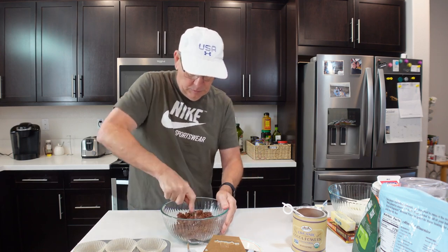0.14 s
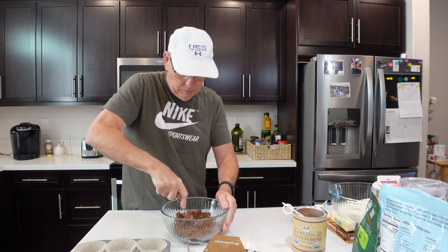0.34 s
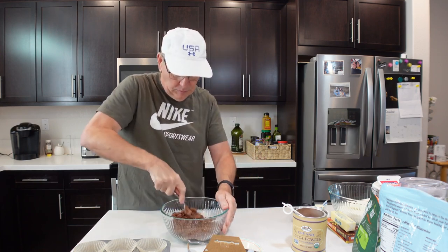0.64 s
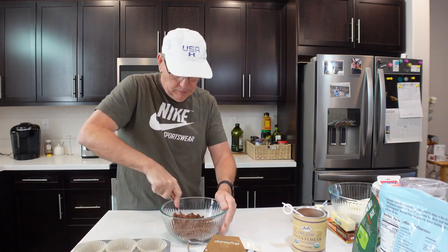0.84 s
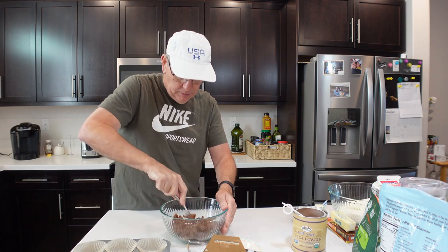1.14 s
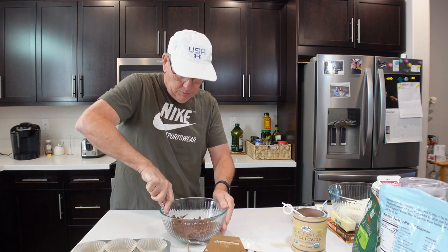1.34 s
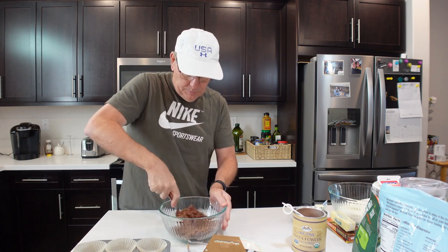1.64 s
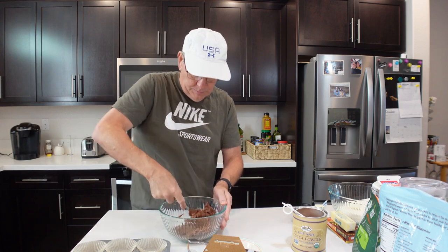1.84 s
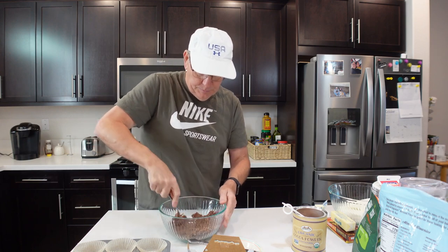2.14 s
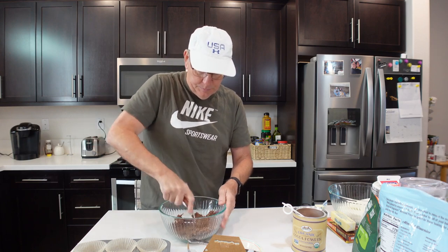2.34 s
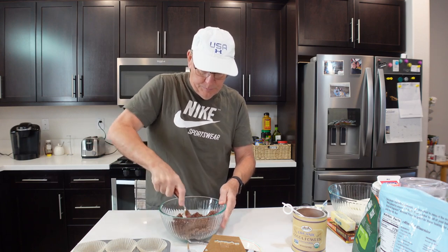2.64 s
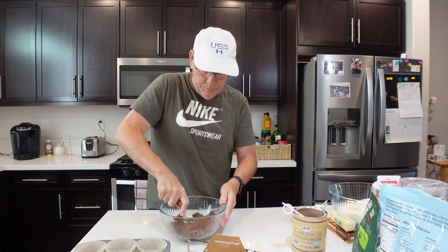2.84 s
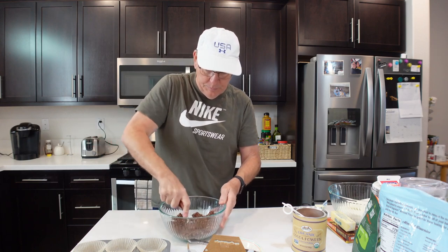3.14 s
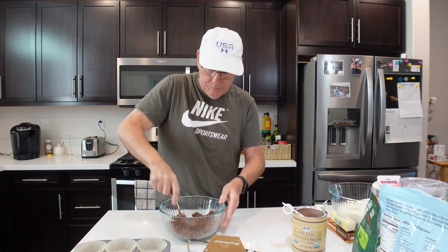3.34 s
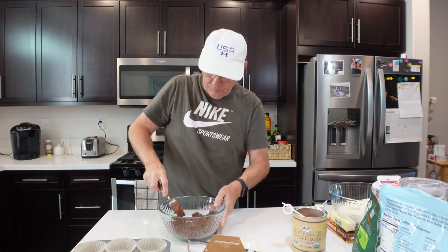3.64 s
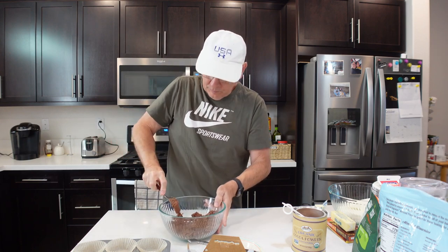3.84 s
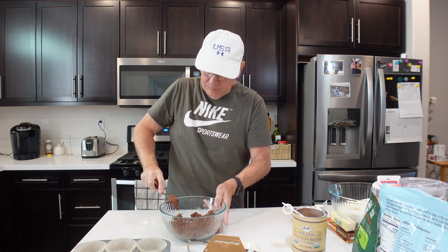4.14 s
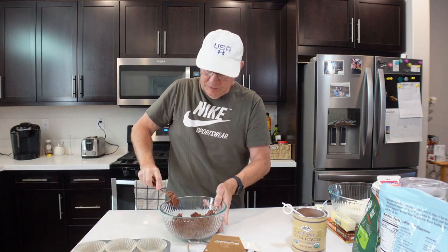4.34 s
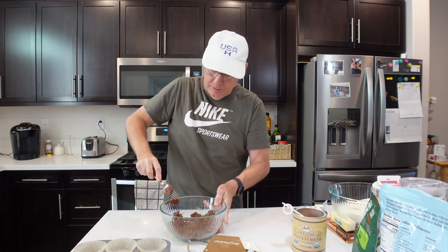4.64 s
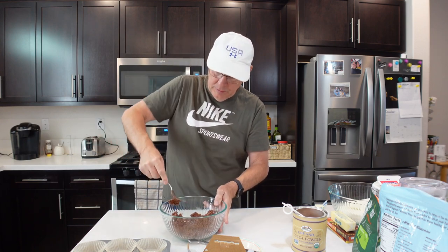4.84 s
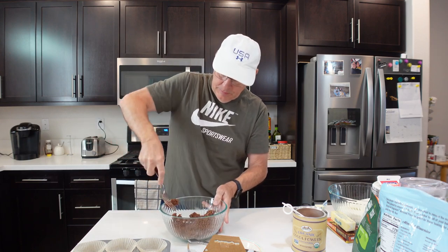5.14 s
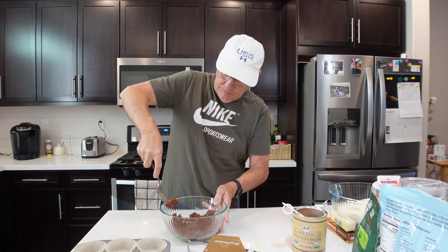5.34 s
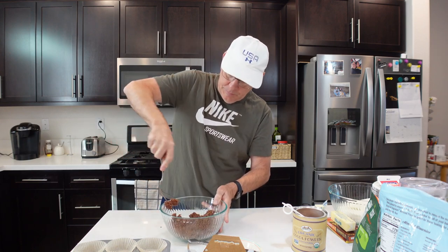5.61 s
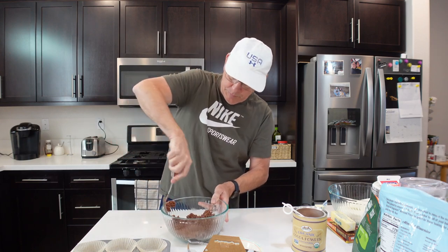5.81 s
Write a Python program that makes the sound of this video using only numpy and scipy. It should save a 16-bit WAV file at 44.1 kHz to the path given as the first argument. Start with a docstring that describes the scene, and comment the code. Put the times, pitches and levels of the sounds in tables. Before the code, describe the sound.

A metal spoon stirs thick dough in a glass bowl, with dull knocks, a few bright ringing clinks and faint scraping in a lively kitchen.

```python
"""Stirring dough in a glass bowl

A metal spoon stirs thick dough in a glass bowl held on a kitchen counter.
Dull knocks: short damped modes plus a noise crunch. Clinks on bare glass: dense clatter plus ringing modes.
The spoon scrapes the wall (random slips, some ringing the glass); the dough squelches (random dull pops).
A decaying noise tail gives a lively room; shaped steady noise gives its low hum."""
import sys
import numpy as np
from scipy import signal
from scipy.fft import rfft, irfft
from scipy.io import wavfile
from scipy.ndimage import uniform_filter1d

SR = 44100
rng = np.random.default_rng(int(sys.argv[2]) if len(sys.argv) > 2 else 0)


def store_wav(level_fs):
    """Save 16-bit WAV to argv[1]."""
    pcm = np.round(np.clip(np.atleast_2d(level_fs), -1, 1) * 32767)
    wavfile.write(sys.argv[1], SR, pcm.T.astype(np.int16))


N = 263277
TIME_S = np.arange(N) / SR
RING_S = np.arange(SR * 3 // 4) / SR   # time axis of one struck sound

# Dull knocks. Each row: start in seconds, level in dB, extra thud in dB, extra treble in dB,
# time the spoon goes on bouncing in seconds.
KNOCKS = [(.184, -25, 6, -5, .02), (.2700, 3, -4.5, -4, 0), (0.514, -17, 9.5, -2, 0),
          (.5755, -3, 3.5, -5.5, .02), (.604, -15, 10.5, -3, .02), (1.3361, -14.5, 12, 7, 0),
          (1.3407, 0.5, 3.5, -1.5, 0), (1.755, -32.5, 9.5, -5, 0), (2.7582, -22.5, 13.5, 0.5, 0),
          (2.8417, 5, -2, -2.5, 0), (3.1534, -16, 12, -6, 0), (3.307, -25, 6.5, -8.5, .05),
          (3.709, -4.5, 4.5, -9.5, 0), (3.921, -18, 10, -4, .035), (4.932, -35.5, 16, 2, 0),
          (5.048, -19, 5.5, 2, 0), (5.255, -34, 10, 5, .02)]
# Contact kinds, in the order of the level columns of the glass tables.
PLACES = ["wall", "side", "rim", "rub"]
# Crowd of short-lived resonances in a clink. Each row: frequency in Hz, relative level in dB on the wall,
# on the side, on the rim, when rubbed.
CLATTER = [(100, -10.5, 13.5, -11, 3.5), (447, 23.5, 16.5, 8, 10), (850, 28, 25.5, -3, 14.5),
           (1520, 23, 15.5, -12, 17), (2630, 5, 13, -4, 14), (3450, 19, 15.5, 7.5, 11),
           (4007, 2, -11.5, -1, 7.9), (4397, 19, 11, 14.5, 8.5), (6350, 22.5, 11, -5, 9.3),
           (6980, 14.5, -1, 2, 3.4), (7860, 23, 19, 2, 10), (9350, 12, 11, 8, 10.5),
           (9260, 21.5, -1, 21.5, 8.4), (10680, 11, -1, 4, 6.4), (12000, 9, -3, -2, 6),
           (13200, 0, 0, 6, 6.6), (15600, -5.5, -14, -18, 3.1)]


def knocks():
    """A cushioned blow moves the whole bowl briefly; a thicker cushion gives more thud, less treble."""
    # Dough-damped bowl on the counter. Each row: frequency in Hz, t60 in seconds, level in dB.
    bowl_modes = [(145, 0.02, -21.5), (267, 0.033, -38), (390, 0.039, -28.5), (595, 0.068, -21),
                  (877, 0.024, -14), (1165, 0.021, -9.5), (1440, 0.023, -12.5), (1842, 0.034, -20.5),
                  (2300, 0.035, -30), (3090, 0.02, -29), (4224, 0.035, -28.5), (6160, 0.028, -33),
                  (8200, 0.026, -40), (11090, 0.036, -52)]
    # Gritty crunch of a knock. Each row: frequency in Hz, level in dB.
    crunch_spectrum = [(100, 1.5), (400, 19), (1300, 22.5), (2200, 10.5), (4000, -1.5), (5200, -15),
                       (8500, -7), (11500, -15), (15000, -26.5)]
    cushion_s = .0004   # dough softens the start of each crunch
    out = np.zeros(N)
    hz, t60_s, mode_db = np.transpose(bowl_modes)
    soft_start = 1 - np.exp(-RING_S / cushion_s)
    for start_s, db, thud_db, treble_db in contacts() + bumps():
        cushion = [(620, thud_db), (1150, 0), (1800, treble_db)]
        cushioned_crunch = [(f, level + at_hz(cushion, f)) for f, level in crunch_spectrum]
        crunch = burst(cushioned_crunch, t60_s=.035) * soft_start
        thud = ring(hz, t60_s, mode_db + at_hz(cushion, hz))
        add(out, start_s, from_db(db) * (thud + crunch))
    return out


def contacts():
    """Each knock may be followed by slightly irregular bounces that weaken one by one."""
    spacing_s, first_db, loss_db = .014, -6, 1.5   # first bounce re its knock, loss on each further one
    rows = []
    for start_s, db, thud_db, treble_db, bouncing_s in KNOCKS:
        rows.append((start_s, db, thud_db, treble_db))
        for k, jitter in enumerate(rng.uniform(-.15, .15, size=4)):
            if (k + 1) * spacing_s < bouncing_s:
                bounce_s = start_s + (k + 1 + jitter) * spacing_s
                rows.append((bounce_s, db + first_db - k * loss_db, thud_db, treble_db))
    return rows


def bumps():
    """Faint contacts at random moments, deep in the dough."""
    rate_per_s, mean_db, spread_db = 3, -43, 2
    thud_db, treble_db = 13.5, -6
    draws = rng.random(size=(40, 2))
    times_s = np.cumsum(-np.log(1 - draws[:, 0])) / rate_per_s
    levels_db = mean_db + spread_db * (2 * draws[:, 1] - 1)
    return [(s, db, thud_db, treble_db) for s, db in zip(times_s, levels_db) if s < N / SR]


def clinks(places):
    """A hard contact: a sharp crack, a short clatter and the ring of the glass."""
    # Blows on bare glass. Each row: start in seconds, place, ring level in dB,
    # sustain as a share of the modes' t60, clatter level in dB, clatter t60 in seconds.
    blows = [(0.8172, "wall", 5.5, 0.19, -7, 0.18), (1.516, "wall", -30.5, 0.21, -45, 0.023),
             (2.843, "side", -22, 0.076, -16.5, 0.016), (3.7018, "side", 3, 0.31, -2, 0.1),
             (4.5544, "wall", -55.5, .3, -48.5, 0.025), (5.05, "wall", -25.5, 0.11, -52, 0.033),
             (5.766, "rim", 4, 0.33, -2, 0.23)]
    # The dragged spoon catches and snaps free. Each row: start in seconds, ring level in dB.
    snaps = [(1.333, -24.5), (2.41, -39), (4.318, -30.5), (5.15, -18.5), (5.289, -27), (5.318, -27)]
    snap_sustain, snap_clatter_db, snap_t60_s = 0.26, -7, 0.064   # clatter re the ring
    out = np.zeros(N)
    catches = [(s, "rub", db, snap_sustain, db + snap_clatter_db, snap_t60_s) for s, db in snaps]
    for start_s, place, ring_db, sustain, clatter_db, t60_s in blows + catches:
        if place in places:
            crack = from_db(-2) * glass_clatter(place, t60_s=.005)
            clatter = from_db(clatter_db) * (crack + glass_clatter(place, t60_s))
            add(out, start_s, clatter + from_db(ring_db) * glass_ring(place, sustain))
    return out


def glass_ring(place, sustain):
    """The place of contact sets how strongly each mode rings; dough and spoon shorten the ring."""
    # Modes of bowl and spoon. Each row: frequency in Hz, t60 in seconds before the sustain factor,
    # relative level in dB on the wall, on the side, on the rim, when rubbed.
    glass_modes = [(505, .18, -42, -40, -36, -40), (750, .12, -38, -24, -60, -40),
                   (1195, .14, -40, -22, -46, -38), (1340, .15, -34, -38, -42, -38),
                   (2020, .16, -23, -35, -52, -36), (2090, .2, -25, -29, -40, -27),
                   (2140, .23, -20, -33, -50, -31), (3195, .24, -27, -28, -36, -32),
                   (3265, .26, -25, -21, -40, -31), (4565, .26, -42, -37, -29, -30),
                   (4680, .24, -38, -33, -36, -32), (6200, .26, -37, -20, -27, -33),
                   (7970, .18, -32, -29, -22, -25), (8160, .16, -37, -25, -24, -28),
                   (8405, .2, -42, -23, -38, -28), (8810, .14, -33, -33, -34, -33),
                   (9875, .14, -29, -46, -19, -29), (9960, .16, -33, -29, -29, -35),
                   (11210, .15, -39, -28, -52, -33), (12110, .13, -34, -38, -37, -29),
                   (12450, .12, -42, -36, -40, -34), (12865, .14, -55, -46, -32, -32),
                   (13550, .13, -41, -52, -46, -29), (14490, .13, -41, -37, -50, -32),
                   (14900, .12, -42, -47, -46, -35)]
    hz, t60_s, *levels_db = np.transpose(glass_modes)
    return ring(hz, t60_s * sustain, levels_db[PLACES.index(place)]) / np.sqrt(sustain)


def glass_clatter(place, t60_s):
    """The dense, quickly dying part of metal on glass."""
    hz, *levels_db = np.transpose(CLATTER)
    return burst(np.column_stack([hz, levels_db[PLACES.index(place)]]), t60_s)


def scrape():
    """Tiny slips of the spoon give a dry rasp; where the glass is bare they also make it sing."""
    # How bare the glass is under the spoon. Each row: time in seconds, share 0-1.
    bareness = [(0, 0.3), (3.6, 0.16), (4.3, .9), (5.97, 0.67)]
    slips = grains(per_s=900, spread_db=4)
    body = glass_ring("rub", sustain=.45)
    slip_fade = np.linspace(1, 0, round(.0045 * SR))   # 4.5 ms
    tick = even_out(rng.standard_normal(len(slip_fade)) * slip_fade, width_hz=600)
    rubbed = [(hz, rub_db) for hz, *struck_db, rub_db in CLATTER]
    colour = from_db(at_hz(rubbed, np.fft.rfftfreq(N, 1 / SR)))
    ticks = signal.fftconvolve(slips, tick)[:N]
    rasp = rms_one(irfft(rfft(ticks) * colour, N))
    bare_share = np.interp(TIME_S, *np.transpose(bareness))
    singing = bare_share * rms_one(signal.fftconvolve(slips, body)[:N])
    return spoon_pressure() * (from_db(-4) * rasp + from_db(-3) * singing)


def spoon_pressure():
    """Each stroke bears down on the wall, holds and lets go; in between the spoon only glides."""
    # Strokes along the wall. Each row: start in seconds, length in seconds, level in dB.
    strokes = [(1.1, 0.48, -53), (1.5, 0.81, -65.5), (2.412, .13, -63), (3.15, 0.071, -59.5),
               (3.567, 0.06, -69), (3.81, .04, -39.5), (3.86, 0.47, -60.5), (4.273, 0.065, -52.5),
               (4.487, .1, -75), (5.08, .18, -56), (5.258, 0.18, -53)]
    attack_share, release_s, glide_db = 0.26, 0.032, -83   # attack as a share of the stroke length
    power = from_db(glide_db) ** 2
    for start_s, length_s, db in strokes:
        attack = np.clip((TIME_S - start_s) / (attack_share * length_s), 0, 1)
        release = np.exp(-np.maximum(TIME_S - start_s - length_s, 0) / release_s)
        power = power + (from_db(db) * attack * release) ** 2
    return np.sqrt(power)


def dough():
    """Sticky pockets open and close in soft, dull pops."""
    pops = grains(per_s=500, spread_db=3)
    pop_spectrum = [(80, -9.5), (200, 3), (600, 10.5), (1300, 4), (2300, -23.5),
                    (5000, -33.5), (15000, -43.5)]   # Hz, dB
    pop = burst(pop_spectrum, t60_s=0.011)
    return dough_effort() * rms_one(signal.fftconvolve(pops, pop)[:N])


def dough_effort():
    """The dough churns steadily and swells as the spoon pushes on after each knock."""
    churn_db = -58.5
    push_db, peak_s = -56.5, 0.22   # swell behind a 0 dB knock, its delay
    push_follows = .2   # dB per dB of the knock
    power = from_db(churn_db) ** 2
    for start_s, db, *_ in KNOCKS:
        age = np.maximum(TIME_S - start_s, 0) / peak_s
        swell = age * np.exp(1 - age)
        power = power + (from_db(push_db + push_follows * db) * swell) ** 2
    return np.sqrt(power)


def kitchen(x, room_db, build_s):
    """Reflections off counter and cupboards thicken into a tail that dies band by band."""
    # Decay of the room before the closing fade. Each row: band centre in Hz, t60 in seconds.
    room_decay = [(150, 0.63), (500, .58), (1200, 0.5), (3000, 0.52), (8000, 0.4), (15000, 0.11)]
    white = rfft(rng.standard_normal(len(RING_S)))
    hz = np.fft.rfftfreq(len(RING_S), 1 / SR)
    centres_hz, t60s_s = np.transpose(room_decay)
    tail = 0
    for share, t60_s in zip(np.eye(len(centres_hz)), t60s_s):
        band = irfft(white * at_hz(np.column_stack([centres_hz, share]), hz), len(RING_S))
        tail = tail + band * fade(t60_s)
    swell = 1 - np.exp(-RING_S / build_s)
    closing_fade = np.linspace(1, 0, len(RING_S))
    tail = even_out(tail * swell, width_hz=250) * np.sqrt(swell) * closing_fade
    return x + from_db(room_db) * signal.fftconvolve(x, energy_one(tail))[:N]


def room_hum():
    """Steady noise, strongest at low frequencies."""
    # Room tone. Each row: frequency in Hz, relative density in dB per Hz.
    hum_spectrum = [(15, -48), (25, -9.5), (53, -10.5), (123, -1.5), (200, -5.5), (236, -6), (427, -4),
                    (503, -7.5), (641, -9), (695, -12), (818, -12.5), (1700, -20), (2610, -31),
                    (8140, -35.5), (16000, -44.5)]
    return from_db(-50) * rms_one(noise(hum_spectrum, N))


def ring(hz, t60_s, db):
    """Damped sines of alternating sign, all starting at the blow."""
    out = 0
    for k in range(len(hz)):
        sine = np.sin(2 * np.pi * hz[k] * RING_S)
        out = out + (-1) ** k * from_db(db[k]) * sine * fade(t60_s[k])
    return out


def burst(spectrum, t60_s):
    """Decaying noise: countless close resonances struck at once and dying together."""
    return noise(spectrum, len(RING_S)) * energy_one(fade(t60_s))


def noise(spectrum, size):
    """Noise whose density follows (Hz, dB) points; 0 dB is white noise of rms 1."""
    gain = from_db(at_hz(spectrum, np.fft.rfftfreq(size, 1 / SR)))
    return irfft(rfft(rng.standard_normal(size)) * gain, size)


def grains(per_s, spread_db):
    """Random tiny clicks of uneven size and either sign."""
    sizes = from_db(spread_db * np.minimum(rng.exponential(1, N), 4)) * rng.choice([-1, 1], N)
    return sizes * (rng.random(N) < per_s / SR)


def fade(t60_s):
    """An exponential decay that loses 60 dB in t60_s."""
    return np.exp(-np.log(1000) * RING_S / t60_s)


def even_out(x, width_hz):
    """Level the broad humps of a random response and keep its fine ripple, as in a diffuse room."""
    spectrum = rfft(x)
    size = max(int(width_hz * len(x) / SR), 3)
    smooth_power = uniform_filter1d(np.abs(spectrum) ** 2, size)
    return irfft(spectrum / np.sqrt(smooth_power + 1e-12), len(x))


def high_pass(x, hz):
    """Second-order bass roll-off."""
    return signal.sosfilt(signal.butter(2, hz, "high", fs=SR, output="sos"), x)


def add(track, start_s, sound):
    """Mix a sound into the track from start_s on."""
    start = round(start_s * SR)
    track[start:start + len(sound)] += sound[:max(N - start, 0)]


def at_hz(points, hz):
    """Read (Hz, value) points on a log-frequency axis."""
    knots_hz, values = np.transpose(points)
    return np.interp(np.log(np.maximum(hz, 1)), np.log(knots_hz), values)


def from_db(db):
    """Decibels to gain."""
    return 10 ** (np.asarray(db) / 20)


def rms_one(x):
    """Scale to unit rms."""
    return x / np.sqrt(np.mean(x ** 2) + 1e-20)


def energy_one(x):
    """Scale to unit energy."""
    return x / np.sqrt(np.sum(x ** 2) + 1e-20)


def scene():
    """Clinks deep in the bowl are thrown up into the room; rim and dull knocks are heard more directly."""
    dull = kitchen(knocks() + dough(), room_db=-4.5, build_s=0.002)
    deep = kitchen(clinks(["wall", "side"]), room_db=1.5, build_s=0.0038)
    high = kitchen(clinks(["rim", "rub"]) + scrape(), room_db=-2, build_s=0.0023)
    bowl = high_pass(dull + deep + high, hz=159.5)   # bass below about 160 Hz is rolled off
    return (bowl + room_hum())[None]


def record(dry):
    """The highest peaks are rounded towards a ceiling of 0.88, then the top is cut above 16 kHz."""
    rounded = dry / (1 + (dry / .88) ** 6) ** (1 / 6)
    return signal.sosfilt(signal.ellip(10, .1, 90, 16000, fs=SR, output="sos"), rounded)


dry = scene()
out = record(dry)
store_wav(out)
```